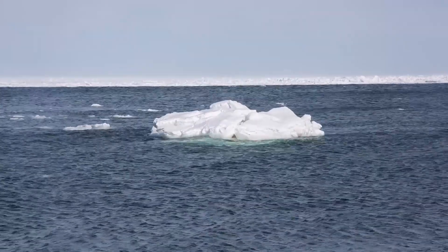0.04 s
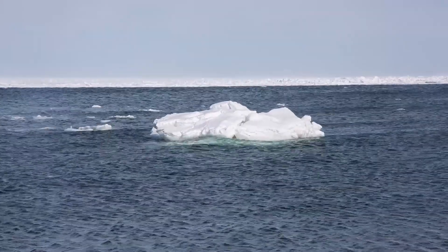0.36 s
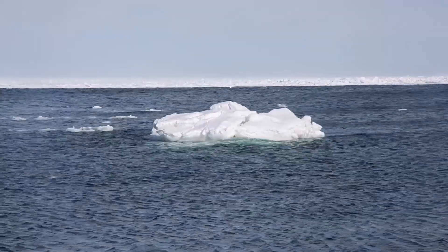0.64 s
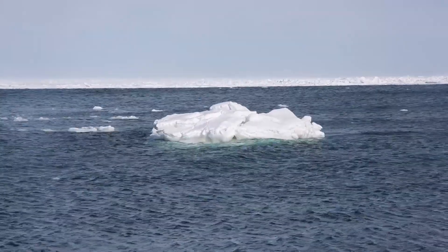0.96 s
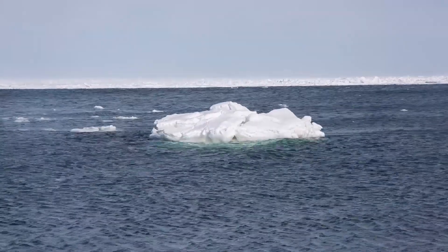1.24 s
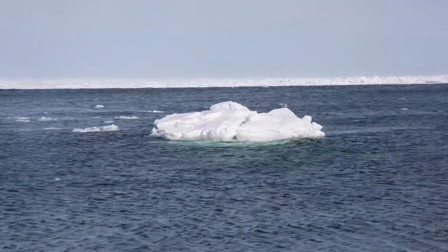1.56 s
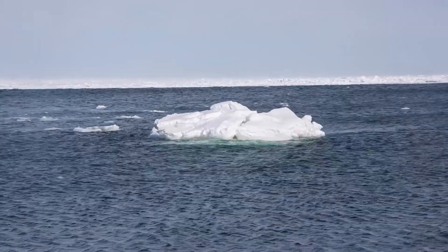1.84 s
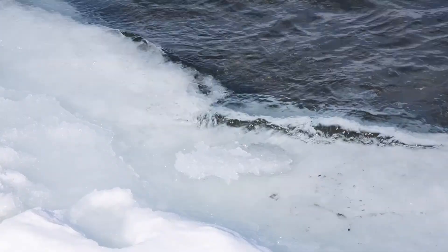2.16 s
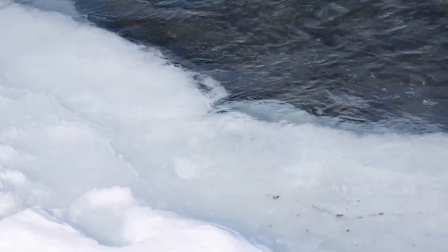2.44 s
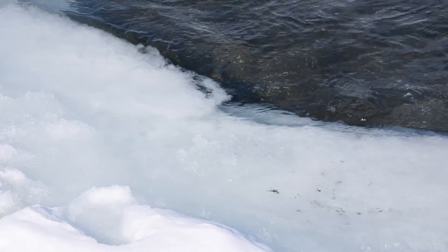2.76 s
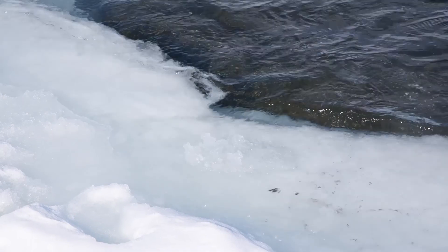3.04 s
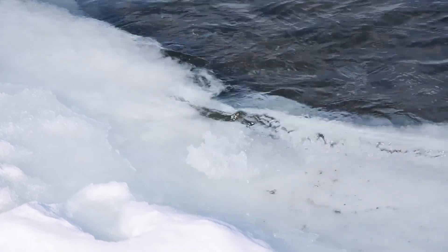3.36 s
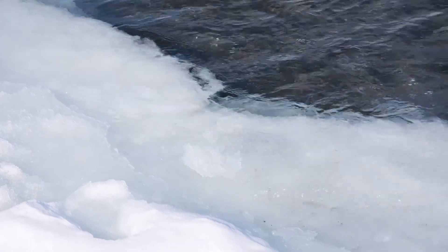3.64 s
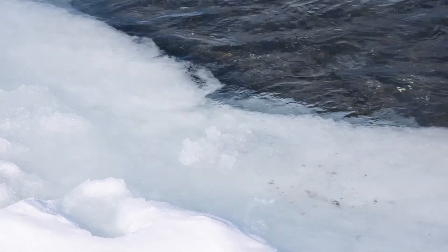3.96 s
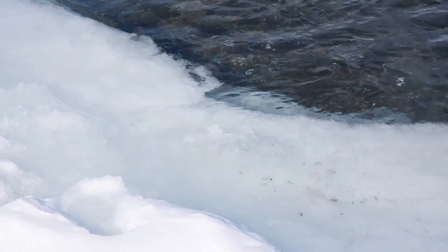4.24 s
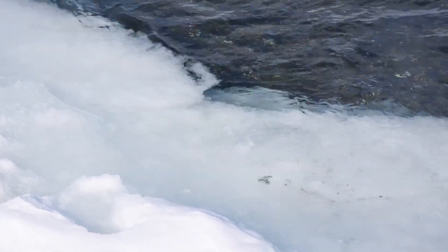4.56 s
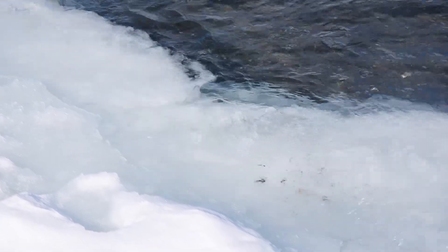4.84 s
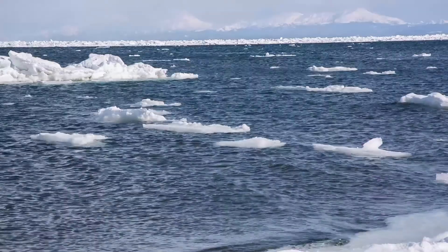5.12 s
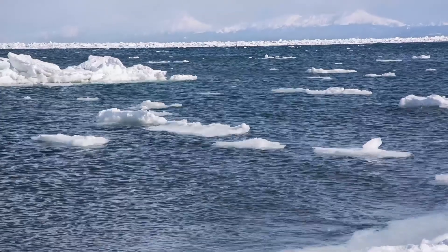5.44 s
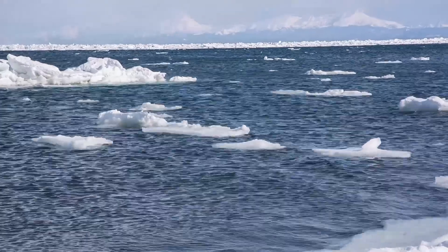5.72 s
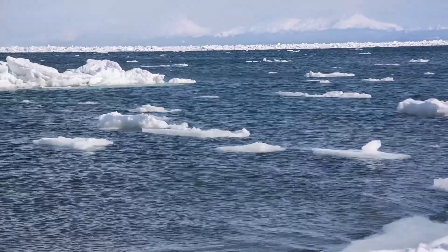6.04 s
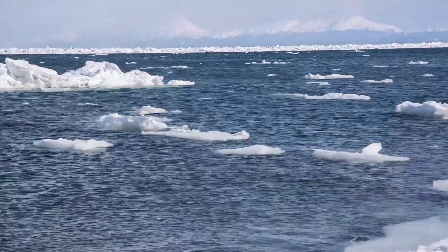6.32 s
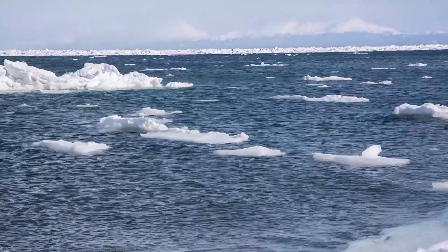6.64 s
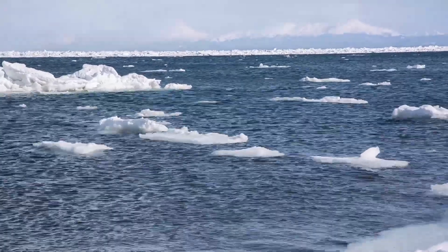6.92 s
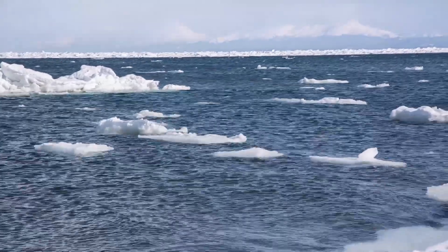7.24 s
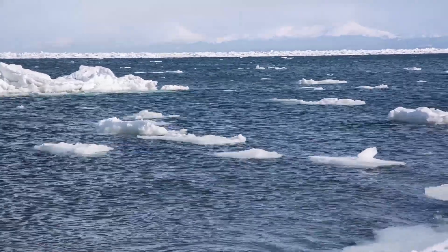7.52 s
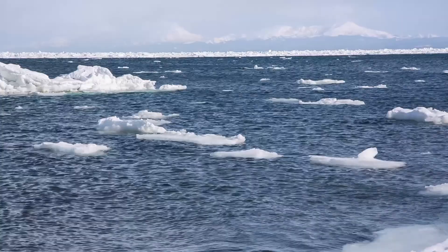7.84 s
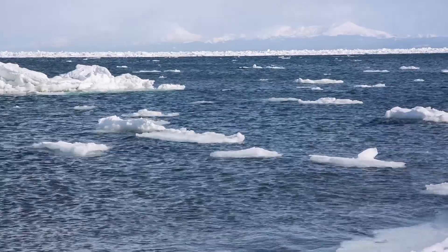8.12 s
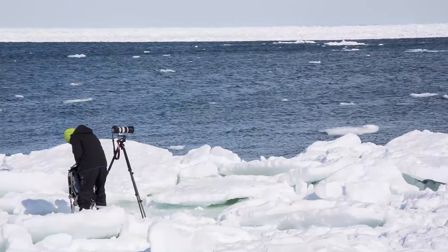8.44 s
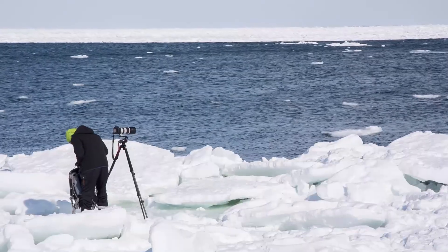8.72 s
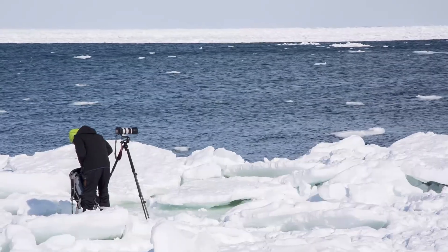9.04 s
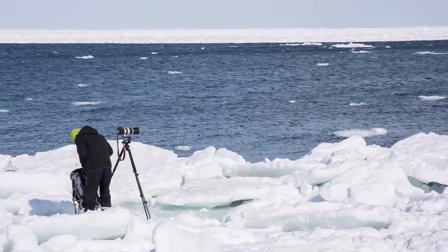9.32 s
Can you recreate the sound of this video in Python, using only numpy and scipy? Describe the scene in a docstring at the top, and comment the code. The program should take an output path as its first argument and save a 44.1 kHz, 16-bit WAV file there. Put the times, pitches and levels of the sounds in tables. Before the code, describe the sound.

Small waves lap and fizz against an ice edge while wind gusts rumble and thump on the microphone.

```python
"""On a windy shore, small waves wash against a shelf of sea ice. They gurgle and fizz because
they are full of tiny ringing bubbles, and they throw drops that plop and spray that ticks.
Gusts rumble on the microphone, with a sharp thump whenever an eddy (a swirl of air) hits it.
Behind it all lie a steady hush, a few hollow tones and a faint electronic whine."""
import sys
import numpy as np
from scipy import signal
from scipy.io import wavfile
from scipy.ndimage import uniform_filter1d

SR = 44100
rng = np.random.default_rng(int(sys.argv[2]) if len(sys.argv) > 2 else 0)


def bounce(signal):
    """Save signal as a 16-bit WAV file at the path given by the first command-line argument."""
    frames = np.transpose(np.atleast_2d(signal))
    limited = np.clip(frames, -1, 1)
    pcm = np.round(limited * 32767).astype(np.int16)
    wavfile.write(sys.argv[1], SR, pcm)


N = 422478
TIME = np.arange(N) / SR
CLOCK = np.arange(0, N / SR, .001)   # one step per millisecond, for loudness curves

# The tone of the steady background hush, with a faint narrow hiss near 2450 Hz.
# Each row: pitch in Hz, relative level in dB.
BACKGROUND_COLOUR = [(30, -0.5), (200, 1), (600, 5.5), (1100, 1.5), (1800, -10.5), (2450, -5), (3500, -13),
                     (6000, -15), (10000, -15.5), (16000, -20)]
# Faint hollow tones. Each row: start and end in seconds, pitch in Hz, width in Hz, level in dB.
HOLLOW_TONES = [(0, 1.9, 2430, 250, -79), (8.9, 9.58, 2420, 200, -72), (8.85, 9.58, 680, 50, -65.5)]
# The electronic whine. Each row: pitch in Hz, level in dB.
WHINE_TONES = [(15650, -87), (15692, -96)]
# The basic tone of the wind. Each row: pitch in Hz, relative level in dB.
WIND_COLOUR = [(25, -39), (60, -10), (120, -1.5), (230, 0.5), (330, -4), (500, -10.5), (1000, -17),
               (2000, -28), (4000, -74)]
# The breeze under the gusts. Each row: time in seconds, strength in dB.
BREEZE = [(0, -65), (1.6, -77), (1.8, -57.5), (2.15, -49), (2.75, -37), (3.28, -57.5), (3.6, -49.5),
          (3.95, -50.5), (4.4, -41.5), (5.12, -51.5), (5.8, -42.5), (6.3, -34.5), (6.55, -51), (7.0, -47),
          (7.22, -55.5), (8.45, -55.5), (8.8, -44.5), (9.35, -56.5)]
# Gusts of wind. Each row: start in seconds, time held in seconds, strength in dB.
GUSTS = [(0.025, 0.14, -53), (0.24, 0.058, -43), (0.362, 0.12, -43.5), (0.635, 0.028, -57.5),
         (0.77, 0.022, -49.5), (0.859, 0.13, -38), (1.082, 0.038, -43.5), (1.172, .11, -49),
         (1.383, .14, -51), (1.667, 0.058, -46.5), (1.812, 0.019, -48), (1.895, 0.087, -46),
         (2.407, .12, -36.5), (2.603, .22, -36.5), (2.677, 0.064, -29), (2.933, 0.026, -44),
         (3.42, 0.0346, -46), (3.54, 0.072, -47.5), (3.79, 0.026, -41.5), (4.023, .12, -39.5),
         (4.194, 0.148, -44.5), (4.387, 0.0675, -33), (4.776, 0.0367, -42), (4.938, 0.1084, -40.5),
         (5.155, 0.048, -44.5), (5.99, .11, -30.5), (6.164, .1, -27), (6.467, 0.031, -37),
         (6.635, 0.13, -38.5), (6.838, 0.11, -42), (7.068, 0.083, -44), (7.286, .03, -52),
         (7.469, 0.022, -48), (7.709, 0.018, -44), (7.846, 0.127, -46), (8.255, 0.036, -46.5),
         (8.991, 0.028, -41.5), (9.162, 0.0535, -49), (9.42, 0.15, -44.5)]
# Strong eddies. Each row: time in seconds, thump strength in dB, snap strength in dB.
STRONG_EDDIES = [(0.844, -26, -37.5), (0.918, -33, -25), (0.979, -26.5, -35), (1.4607, -21.5, -43),
                 (1.493, -29.5, -49), (1.695, -30.5, -54), (2.1174, -35, -40), (2.2276, -27.5, -49),
                 (2.3155, -21, -31), (2.379, -21.5, -38.5), (2.438, -35, -25.5), (2.4535, -25.5, -23.5),
                 (2.656, -26, -25.5), (2.689, -28, -24.5), (2.7732, -24, -26), (2.846, -17.5, -47),
                 (3.596, -31.5, -46), (3.6373, -28.5, -50), (3.9341, -26.5, -54), (4.03, -26.5, -34.5),
                 (4.277, -24, -40), (4.3924, -29, -37), (4.419, -23, -26), (4.444, -28, -27.5),
                 (4.486, -24.5, -49), (4.572, -27, -33), (5.3362, -27, -47), (5.3665, -19.5, -25.5),
                 (5.399, -37.5, -37.5), (5.424, -32.5, -48), (5.7604, -32.5, -34), (5.8857, -12, -18),
                 (6.0224, -13, -19.5), (6.2247, -19, -19), (6.2379, -24, -15.5), (6.618, -30, -31),
                 (7.8687, -32, -43), (8.072, -35, -48.5), (8.3055, -29.5, -44)]
# Drops falling into water. Each row: time in seconds, strength in dB, starting pitch in Hz.
DROPS = [(1.7692, -58, 2540), (3.133, -44, 1248), (3.8634, -45, 2470), (4.5532, -48, 3340),
         (4.6278, -44, 2940), (4.64, -54, 6160), (4.649, -35, 3250), (4.6483, -42, 1750),
         (4.7078, -45, 6400), (4.76, -47, 5370), (4.751, -42.5, 2830), (4.8326, -46, 2690),
         (4.834, -46, 7470), (4.907, -42.5, 2590), (5.231, -43, 2370), (7.183, -47.5, 2370),
         (7.2709, -45.5, 2830), (7.352, -42, 1005), (8.1807, -41.5, 2224), (8.454, -46.5, 3400),
         (9.2129, -44.5, 1670), (9.321, -45.5, 1180)]
# Spray landing on the ice. Each row: time in seconds, peak level in dB.
SPRAY_TICKS = [(3.8087, -45), (4.281, -45), (4.811, -40), (4.92, -35.5), (5.014, -37), (5.036, -35.5),
               (6.2592, -37.5), (6.3442, -37.5), (8.1185, -35), (8.2927, -39), (8.9085, -38.5),
               (9.206, -42), (9.275, -38)]
# The basic tone of the wash (bubbles and foam). Each row: pitch in Hz, relative level in dB.
WASH_COLOUR = [(300, 10), (700, 4), (1300, 3.5), (2300, 4), (3300, 1), (5000, -2), (7500, -3.5),
               (10000, -11), (13000, -3.5), (16000, -40)]
# Ripples lapping between the waves. Each row: time in seconds, wash strength in dB.
RIPPLES = [(0, -77.5), (1.6, -81), (2.4, -74), (3.5, -69), (5.5, -73.5), (7.0, -68), (8.7, -69.5),
           (9.58, -66.5)]
# Crests slapping the ice. Each row: start in seconds, time held in seconds, wash strength in dB.
SPLASHES = [(1.747, .04, -69.5), (2.697, .015, -66), (3.795, 0.076, -60), (4.58, .1, -59),
            (4.811, .025, -62.5), (4.912, 0.0173, -57), (5.001, 0.029, -58.5), (5.125, .01, -60.5),
            (5.222, 0.014, -56), (7.16, .03, -62.5), (7.895, 0.019, -56.5), (8.099, 0.027, -55.5),
            (9.259, 0.047, -55.5)]
# Waves running up the ice and draining. Each row: crest start and length in seconds, wash strength
# in dB, seconds to rise 20 dB, seconds to fall 20 dB, churn (boost for big, low bubbles) in dB.
WAVES = [(0.7, 0.15, -74, 1.5, 1, 0), (1.963, 0.13, -70.5, 0.18, 1, 5), (2.376, 0.15, -65, .2, .2, -3),
         (2.894, 0.21, -61.5, 0.42, 0.35, 7), (4.26, 0.1, -69, 0.87, 3, 1.5),
         (4.751, 0.38, -64, .5, 0.5, 1), (6.153, 0.23, -54.5, 0.72, 0.3523, 4.5),
         (7.52, 0.232, -64, 0.54, 0.57, 9), (8.05, 0.18, -56, 1, 0.3, -1.5),
         (9.224, 0.123, -69.5, .2, .4, 1.5)]


def from_db(db):
    """Turns decibels into a number to multiply a sound by."""
    return 10 ** (np.asarray(db) / 20)


def power_of(db):
    """Turns decibels into power, which can be added up."""
    return 10 ** (np.maximum(db, -200) / 10)


def rms_one(x):
    """Scales a sound to an average (RMS) level of 1."""
    return x / np.sqrt(np.mean(x ** 2) + 1e-20)


def evened(x, span_s):
    """Holds the slow level at 1 and keeps the fast grain."""
    return x / np.sqrt(np.abs(uniform_filter1d(x ** 2, int(span_s * SR))) + 1e-20)


def on_clock(rows):
    """Joins (time, value) points into a curve on CLOCK."""
    return np.interp(CLOCK, *np.transpose(rows))


def per_sample(curve):
    """Fills in a CLOCK curve at every sample."""
    return np.interp(TIME, CLOCK, curve)


def at_hz(colour, hz):
    """Reads a colour table's level at one pitch."""
    pitches, levels_db = np.transpose(colour)
    return np.interp(np.log(hz), np.log(pitches), levels_db)


def swell(start, hold_s, rise_s, fall_s):
    """A curve in dB that rises to 0, holds and falls; rise and fall times are per 20 dB."""
    before, after = np.maximum(start - CLOCK, 0), np.maximum(CLOCK - start - hold_s, 0)
    return -20 * (before / rise_s + after / fall_s)


def filtered(x, hz, kind, order=2):
    """Keeps the pitches below hz ("low") or between two edges ("band")."""
    sections = signal.butter(order, np.clip(hz, 10, .45 * SR), kind, fs=SR, output="sos")
    return signal.sosfilt(sections, x + 1e-18)


def drift(rate):
    """A smooth random wobble of size about 1 that changes about rate times a second."""
    r = np.exp(-40 * np.pi * rate / SR)
    slow = signal.lfilter([1], [1, -2 * r, r * r], rng.standard_normal(N // 20 + 2002))[2000:]
    return np.interp(np.arange(N) / 20, np.arange(len(slow)), rms_one(slow))


def noise_bands(count):
    """Half-octave slices of noise from 22 Hz upward, each with its centre pitch."""
    white = rng.standard_normal((2, N))
    for k in range(count):
        low, high = 22 * 2 ** (k / 2), 22 * 2 ** ((k + 1) / 2)
        yield np.sqrt(low * high), filtered(white[k % 2], [low, high], "band")


def add(track, s, sound):
    """Mixes a short sound into a track at s seconds."""
    start = int(np.clip(s * SR, 0, N - 1))
    track[start:start + len(sound)] += sound[:N - start]


def background_hush(level_db=-68):
    """Steady noise makes an even hush, with a faint narrow hiss near 2450 Hz."""
    hush = sum(band * from_db(at_hz(BACKGROUND_COLOUR, hz)) for hz, band in noise_bands(count=19))
    return from_db(level_db) * rms_one(hush)


def hollow_tones(fade_s=0.1):
    """Narrow bands of noise sound hollow as they come and go."""
    out = np.zeros(N)
    for start, end, hz, width, db in HOLLOW_TONES:
        tone = filtered(rng.standard_normal(N), [hz - width / 2, hz + width / 2], "band", order=1)
        fade = np.clip(1 + np.minimum(TIME - start, end - TIME) / fade_s, 0, 1)
        out += from_db(db) * rms_one(tone) * fade
    return out


def whine():
    """Two steady, very high tones make a thin electronic whine."""
    return sum(np.sqrt(2) * from_db(db) * np.sin(2 * np.pi * hz * TIME) for hz, db in WHINE_TONES)


def wind_strength(rise_s=0.013, fall_s=0.03):
    """Gusts add to the breeze, giving the wind's strength in dB."""
    power = power_of(on_clock(BREEZE))
    for start, hold_s, db in GUSTS:
        edge_s = 0.205 * hold_s   # longer gusts have softer edges
        power += power_of(db + swell(start, hold_s, rise_s + edge_s, fall_s + edge_s))
    return per_sample(10 * np.log10(power))


def wind_rumble(wind_db, bass_loss=0.32, gain_db=0.73):
    """Air tumbles past the microphone; faster air is louder, and its smaller eddies sound higher."""
    flutter_db = 4 * np.clip(drift(55), -2, 2)
    speed_db = wind_db + flutter_db + 39
    corner_hz = 470 * from_db(0.58 * speed_db)   # pitches above this fade away
    rumble = 0
    for hz, band in noise_bands(count=15):
        bass_octaves = np.clip(np.log2(300 / hz), 0, 2.5)
        colour = from_db(at_hz(WIND_COLOUR, hz) - bass_loss * bass_octaves * np.maximum(speed_db, -6))
        rumble += band * colour / (1 + (hz / corner_hz) ** 4.6)
    return from_db(wind_db + gain_db) * evened(rumble * from_db(flutter_db), span_s=.045)


def small_eddies(wind_db, per_s=11, above_wind_db=5.5, spread_db=2):
    """Small eddies come at random, a little above the wind's strength; rows as in STRONG_EDDIES."""
    scatter_db = spread_db * rng.standard_normal((int(per_s * N / SR), 2))
    times = np.sort(rng.random(len(scatter_db))) * N / SR
    thump_db = np.interp(times, TIME, wind_db) + above_wind_db + scatter_db[:, 0]
    snap_db = thump_db - 22 + scatter_db[:, 1]
    return np.column_stack([times, thump_db, snap_db])


def eddy_thumps(wind_db, wake_s=0.0072, thump_gain_db=-1, snap_gain_db=-3):
    """An eddy hits the microphone with a jolt and a ragged wake: a dull thump and a brighter snap."""
    out, t = np.zeros(N), TIME[:SR // 20]
    for s, thump_db, snap_db in np.vstack([STRONG_EDDIES, small_eddies(wind_db)]):
        push = 0.0962 * rng.standard_normal(len(t)) * np.exp(-t / wake_s)
        push[0] += 2   # the jolt
        thump = filtered(filtered(push, [115, 430], "band"), 612, "low", order=4)
        snap = filtered(filtered(push, [550, 1100], "band"), 2140, "low", order=4)
        add(out, s - .002, thump / np.abs(thump).max() * from_db(thump_db + thump_gain_db))
        add(out, s, snap / np.abs(snap).max() * from_db(snap_db + snap_gain_db))
    return out


def spray_ticks(decay_s=0.00098):
    """Spray that lands on hard ice makes only a short, bright tick."""
    out, t = np.zeros(N), TIME[:SR // 10]
    for s, peak_db in SPRAY_TICKS:
        tick = filtered(rng.standard_normal(len(t)) * np.exp(-t / decay_s), [2500, 11000], "band")
        add(out, s, from_db(peak_db) * tick / np.abs(tick).max())
    return out


def bubble(hz, cycles=50, rise=0.15):
    """A bubble rings, fades and rises in pitch as it nears the surface."""
    life = np.arange(int(cycles / hz * SR) + 2) * hz / (cycles * SR)   # runs from 0 to 1
    return np.sin(2 * np.pi * cycles * life * (1 + rise * life / 2)) * from_db(-60 * life)


def drops(bubble_gain_db=2, splash_gain_db=-15, splash_s=0.0047):
    """A falling drop splashes and traps a ringing bubble."""
    out, t = np.zeros(N), TIME[:SR // 10]
    for s, db, hz in DROPS:
        splash = filtered(rng.standard_normal(len(t)), [hz / 2, hz * 2], "band", order=1)
        add(out, s, from_db(db + splash_gain_db) * rms_one(splash) * np.exp(-t / splash_s))
        add(out, s, from_db(db + bubble_gain_db) * bubble(hz))
    return out


def bubble_cloud(per_s=1900, spread_db=5.5, cycles=23, low_hz=456, high_hz=11470, count=30):
    """Bubbles burst in clumps and each size rings at its own pitch; gives one track per pitch."""
    bursts = np.flatnonzero(rng.random(N) < per_s * from_db(4 * drift(25)) / SR)
    kicks = from_db(spread_db * np.minimum(rng.exponential(1, len(bursts)), 4))
    kicks *= rng.choice([-1, 1], len(bursts))
    size_group = rng.integers(0, count, len(bursts))
    for k, hz in enumerate(np.geomspace(low_hz, high_hz, count)):
        clicks = np.zeros(N)
        clicks[bursts[size_group == k]] = kicks[size_group == k]
        decay = np.exp(-np.log(1000) * hz / (cycles * SR))   # 60 dB quieter after that many cycles
        feedback = [1, -2 * decay * np.cos(2 * np.pi * hz / SR), decay ** 2]
        ringing = signal.lfilter([1, 0, -1], feedback, clicks + 1e-18)
        yield hz, rms_one(ringing) * np.sqrt(hz)


def water_motions():
    """Ripples, waves and splashes. Each gives: wash curve, churn and spray in dB, share of bubbles."""
    yield on_clock(RIPPLES), 6, -1, 0.47
    for start, hold_s, db, rise_s, fall_s, churn_db in WAVES:
        yield db + swell(start, hold_s, rise_s, fall_s), churn_db, -4.5, 0.56
    for start, hold_s, db in SPLASHES:
        yield db + swell(start, hold_s, rise_s=.015, fall_s=.045), -1.5, -3, 0.83


def water_state():
    """The water's motions add up, and the strongest one shapes the tone most."""
    wash = churn = spray = bubbly = 0
    for db, churn_db, spray_db, share in water_motions():
        power = power_of(db)
        wash += power
        churn += power * power_of(churn_db)
        spray += power * power_of(spray_db)
        bubbly += power * share
    return *(10 * np.log10([wash, churn / wash, spray / wash])), bubbly / wash


def waves(patchy_db=2.5):
    """Bubbles and smooth foam swell together; churn sets the low pitches and spray the high ones."""
    wash_db, churn_db, spray_db, bubble_share = map(per_sample, water_state())
    bubbles = list(bubble_cloud())
    foam = [(hz, band * from_db(patchy_db * drift(29))) for hz, band in noise_bands(19) if hz > 250]
    out = 0
    for bands, share in (bubbles, bubble_share), (foam, 1 - bubble_share):
        steady, swelling = 0, 0
        for hz, band in bands:
            band = band * from_db(at_hz(WASH_COLOUR, hz))
            high = np.clip(np.log2(hz / 3800), 0, 1)
            low = np.clip(np.log2(2600 / hz), 0, 1)
            steady += band
            swelling += band * from_db(wash_db + high * spray_db + low * churn_db)
        middle_level = np.std(filtered(steady, [2200, 5000], "band"))   # wash_db refers to this range
        out += np.sqrt(share) * swelling / middle_level
    return out


def scene():
    """Wind at the microphone, water a few steps away, open air without echo."""
    wind_db = wind_strength()
    wind = wind_rumble(wind_db) + eddy_thumps(wind_db)
    water = waves() + drops() + spray_ticks()
    background = background_hush() + hollow_tones() + whine()
    return (background + wind + water)[None]


def record(dry):
    """Cuts the very highest treble steeply, above 15900 Hz."""
    return signal.sosfilt(signal.ellip(12, .1, 70, 15900, fs=SR, output="sos"), dry)


dry = scene()
out = record(dry)
bounce(out)
```